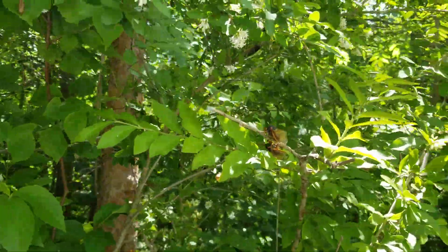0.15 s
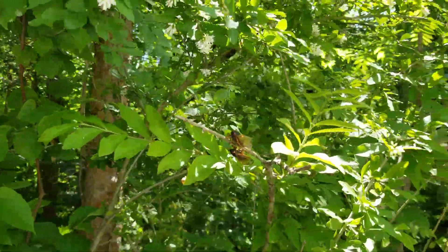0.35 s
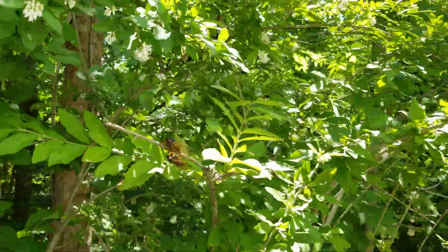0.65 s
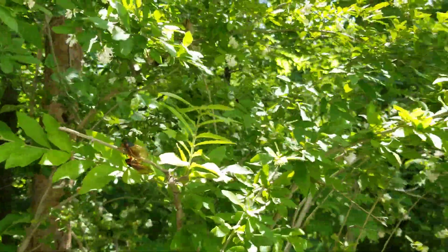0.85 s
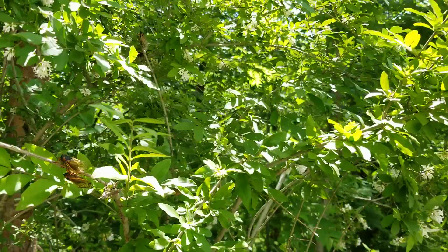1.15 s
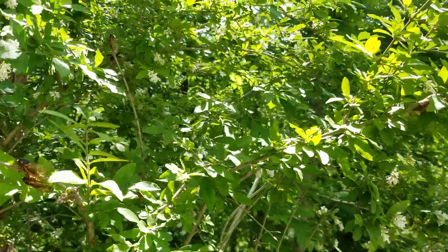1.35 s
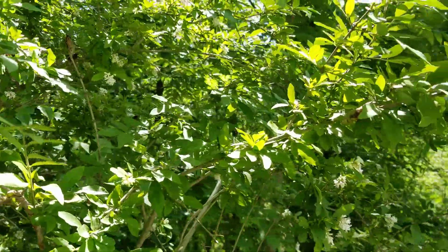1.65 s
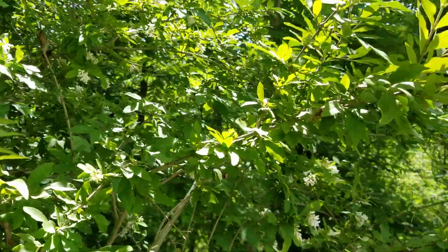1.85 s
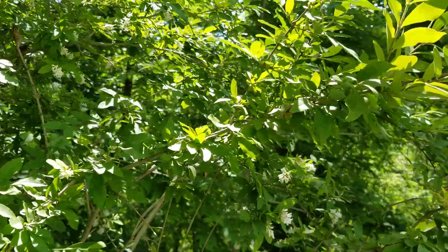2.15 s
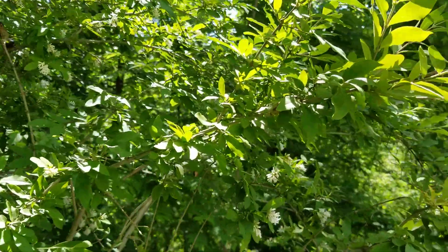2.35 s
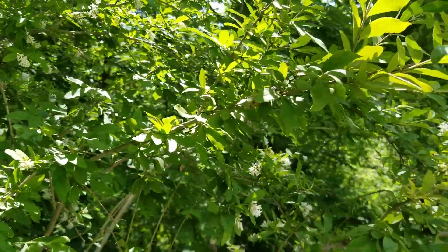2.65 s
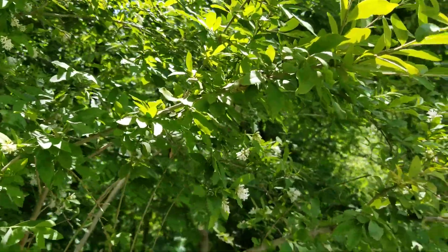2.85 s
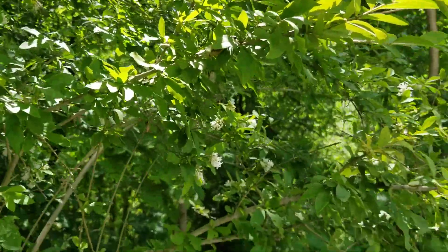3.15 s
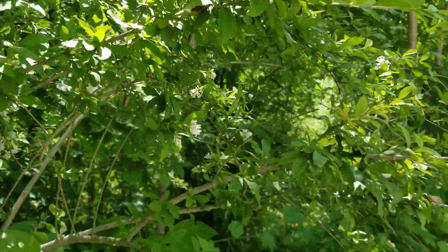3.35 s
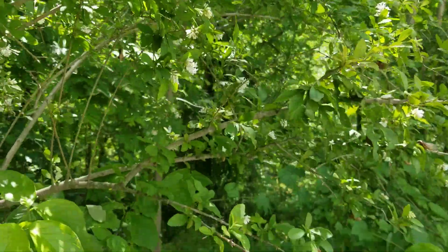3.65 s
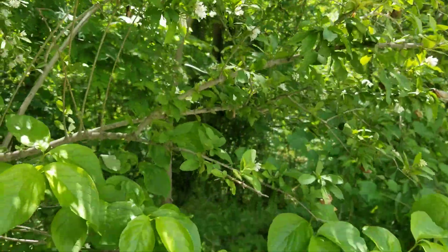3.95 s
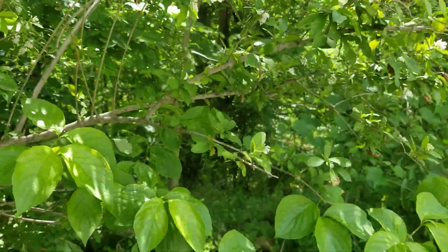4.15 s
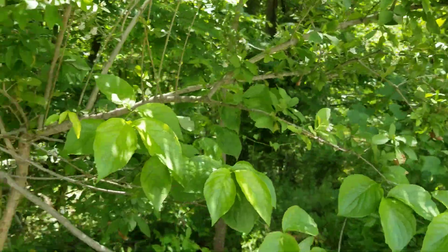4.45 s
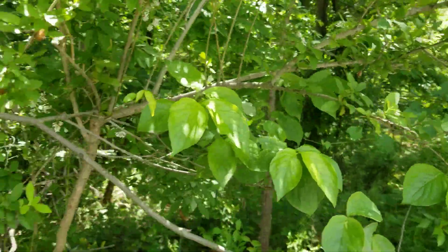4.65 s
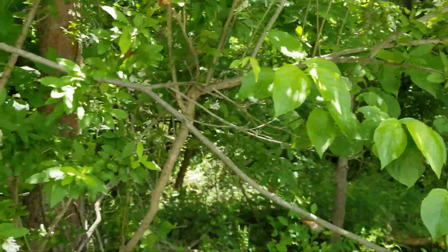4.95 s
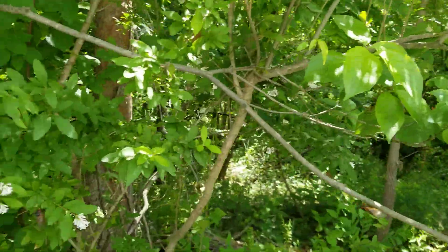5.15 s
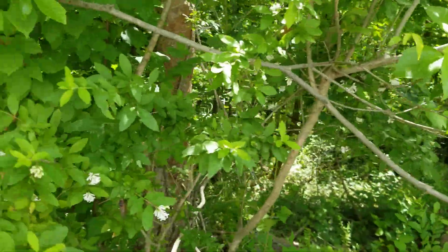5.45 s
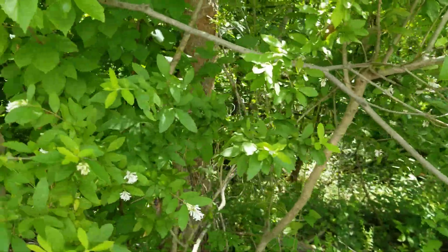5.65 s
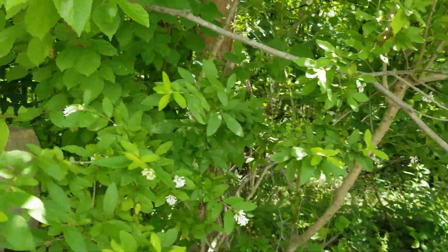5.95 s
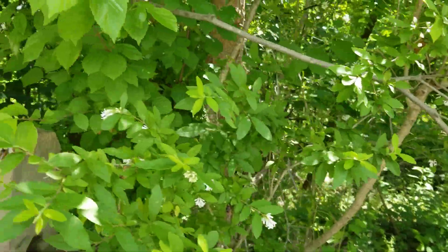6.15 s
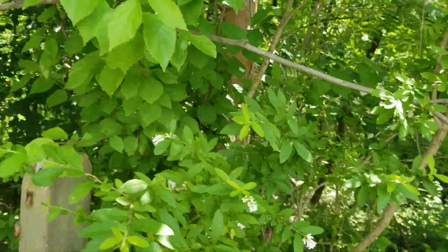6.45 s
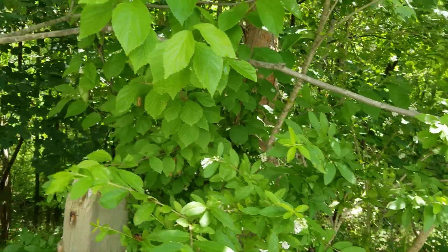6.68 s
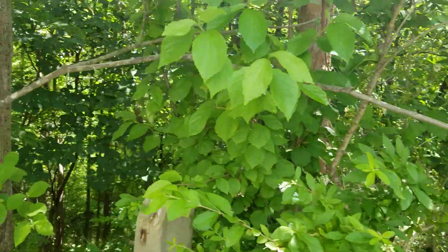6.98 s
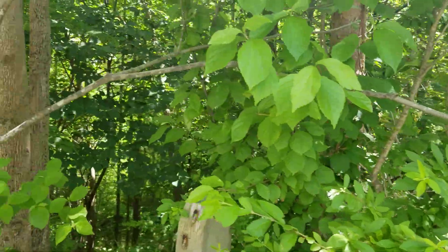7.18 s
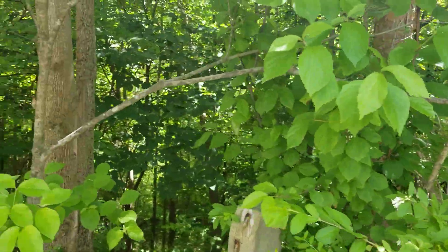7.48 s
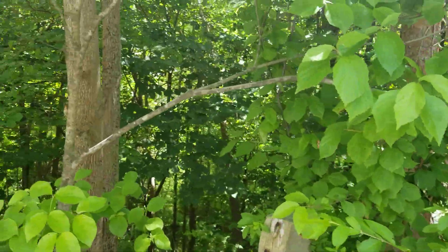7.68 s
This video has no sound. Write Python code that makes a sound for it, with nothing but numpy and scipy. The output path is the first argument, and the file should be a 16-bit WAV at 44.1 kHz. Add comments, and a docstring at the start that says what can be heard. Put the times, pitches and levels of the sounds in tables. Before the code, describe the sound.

In leafy woodland, countless distant cicadas make a constant high sizzle over a smooth, whistly lower drone. Soon a nearby cicada, mostly left, rasps a buzz of about one second, brightening and then dropping abruptly, with a fainter neighbour overlapping. Later a second similar buzz swells and drops. Soft air and distant road rumble lie beneath, the rumble growing late. Outdoor stereo from a handheld device.

```python
"""A woodland full of cicadas: a far shrill chorus, a lower droning species, air, hiss and road rumble.
One near cicada buzzes twice, each buzz ending in a low drop, and a neighbour joins the first buzz.
There are also brief ticks and a faint tone. The far layers are shaped noise. In each near call, pulses from
the tymbals (the ribbed drums of the insect) ring the body and an air sac that opens as the call swells.
Two microphones a hand apart pick it all up."""
import sys
import numpy as np
from scipy import signal
from scipy.io import wavfile
from scipy.ndimage import uniform_filter1d

SR = 44100
rng = np.random.default_rng(int(sys.argv[2]) if len(sys.argv) > 2 else 0)


def master_out(mix):
    """Clip the mix to full scale and print it as 16-bit PCM to the path in sys.argv[1]."""
    frames = np.transpose(np.atleast_2d(mix))
    ceiling = np.clip(frames, -1, 1)
    pcm = np.round(ceiling * 32767).astype(np.int16)
    wavfile.write(sys.argv[1], SR, pcm)


N = 344862  # length of the scene in samples
SPACING_S = 0.00044  # travel time between the microphones
LEFT_LAG_S = 0.000406  # how much later sound from the right-hand side reaches the left microphone
EDGE_HZ = 15775  # upper limit of the microphones

# Near cicada: the two body tones
BODY_WIDTH_HZ, SAC_WIDTH_HZ = 450, 400
BODY_RISE_HZ, BODY_RISE_S = 350, 0.24  # the body tone climbs at the start
BODY_SAG_HZ = 600  # and sinks as the call dies
BODY_RATTLE = .5  # the body hears more of the rattle than the air sac does
BETWEEN_WIDTH_HZ, BETWEEN_DB = 560, -2  # ringing midway between body and sac; level against the sac
# Near cicada: the air sac opens slowly, then snaps shut
OPEN_BEND, SHUT_S = .6, .05
SAC_SHUT_HZ = 4950
SAC_SHUT_DB, SAC_WAKING_DB = -20, -3  # against the open air sac
SAC_STIRS, SAC_WAKES = .12, 0.33  # shares of the opening time at which it starts to sound and is awake
OVERTONE_GROWTH = 1.6  # decibels the overtones swell for each decibel of the sac
# Near cicada: loudness at the start, and pulse rate
ATTACK_S, ATTACK_DB = 0.11, -4
SLOWING = .015  # share by which the pulse rate eases off as the sac opens
WANDER, WANDER_S = .012, .05  # typical share by which the rate wanders, and smoothing time


def amp(db):
    """Turns decibels into gain."""
    return 10 ** (np.asarray(db) / 20)


def evened(x):
    """Scales a sound to an average (rms) level of 1."""
    return x / np.sqrt(np.mean(x ** 2) + 1e-20)


def sides(pan_db):
    """Left and right gains for a left-minus-right level difference."""
    return amp(np.array([pan_db / 2, -pan_db / 2]))


def add(mix, s, sound):
    """Mixes a stereo sound in from time s."""
    part = mix[:, round(s * SR):][:, :sound.shape[1]]
    part += sound[:, :part.shape[1]]


def resonate(x, hz, width_hz):
    """Rings at a pitch that may move: shifts hz to zero, smooths twice, shifts back, with gain 1 at the peak."""
    turn = np.exp(2j * np.pi * np.cumsum(hz * np.ones(x.shape[-1])) / SR)
    r = np.exp(-np.pi * width_hz / SR)
    smooth = signal.lfilter([(1 - r) ** 2], [1, -2 * r, r * r], x / turn)
    return 2 * (turn * smooth).real


def far_crowd(curve, tone, band, direct, patchy_db, pan_db, shading=((0, 0), (1, 0)), size=1024):
    """Countless far sources blur into noise with drifting patches, partly from one side, partly from all around."""
    hop = size // 4
    frames, hz = N // hop + 5, np.fft.rfftfreq(size, 1 / SR)
    a, b, c, d, patches = rng.standard_normal((frames, len(hz), 5)).T
    patches = uniform_filter1d(patches, size=14, axis=0)  # along pitch
    patches = evened(uniform_filter1d(patches, size=12, axis=1))  # along time

    # How alike the two microphones hear each pitch: sound from one side lags, sound from all around blurs
    direct = np.clip(direct, 0, 1)
    from_side = np.exp(2j * np.pi * hz * LEFT_LAG_S)
    all_around = np.sinc(2 * hz * SPACING_S)
    alike = .98 * (direct * from_side + (1 - direct) * all_around)[:, None]
    left = a + 1j * b
    right = alike * left + np.sqrt(1 - abs(alike) ** 2) * (c + 1j * d)
    z = np.array([left, right])

    f, db = np.transpose(tone)
    tone_db = np.interp(np.log(hz + 1), np.log(f + 1), db, -90, -90)
    z *= amp(tone_db[:, None] + patchy_db * patches)
    z *= sides(np.interp(hz, *np.transpose(shading)))[:, :, None]

    # The level curve counts within the band, for the average of both sides
    inside = ((hz > band[0]) & (hz < band[1]))[:, None]
    unit = np.std(signal.istft(z.mean(0) * inside, nperseg=size, noverlap=size - hop)[1])
    sound = signal.istft(z, nperseg=size, noverlap=size - hop)[1][:, :N] / unit
    t = np.arange(N) / SR
    return sound * amp(np.interp(t, *np.transpose(curve))) * sides(pan_db)[:, None]


def road_rumble():
    """Distant traffic heard as deep noise that swells and sinks."""
    # level of 40-250 Hz: (time [s], level [dB])
    road_level = [(0, -46), (2.3, -46.5), (2.8, -43), (4.0, -44), (5.6, -41.5), (6.4, -42.5), (7.2, -37),
                  (7.82, -38)]
    # colour of the noise: (pitch [Hz], relative level per hertz [dB])
    road_tone = [(13, -46), (22, -30), (63, 0), (86, 0.5), (208, -10), (500, -21), (650, -31), (1100, -120)]
    return far_crowd(road_level, road_tone, (40, 250), direct=0.14, patchy_db=1.17, pan_db=1.7, size=4096)


def air_wash():
    """Air and leaves blend into a soft noise below the insects."""
    # level of 400-950 Hz: (time [s], level [dB])
    air_level = [(0, -49.5), (1.5, -51.2), (4.3, -48), (5.1, -50.5), (5.7, -48), (6.8, -50), (7.3, -47),
                 (7.82, -49.5)]
    # colour of the noise: (pitch [Hz], relative level per hertz [dB])
    air_tone = [(200, -7.5), (350, -2.5), (500, -6), (650, 0.5), (850, 4), (1100, 2.5), (1500, -16),
                (1900, -36)]
    return far_crowd(air_level, air_tone, (400, 950), direct=0.18, patchy_db=1.04, pan_db=2.5)


def faint_tone():
    """A low tone of steady pitch: a plain sine that dies away."""
    # its fading level: (time [s], level [dB])
    fading = [(0, -57), (.5, -61), (.9, -63.5), (1.3, -72)]
    t = np.arange(N) / SR
    s, db = np.transpose(fading)
    return amp(np.interp(t, s, db, right=-120)) * np.sqrt(2) * np.sin(2 * np.pi * 342 * t)  # 342 Hz


def hiss_between():
    """Soft noise fills the pitches between the drone and the shrill chorus."""
    # level of 1.8-2.9 kHz: (time [s], level [dB])
    hiss_level = [(0, -53.5), (2.2, -54.5), (4.3, -52.5), (5.3, -53), (6.7, -52), (7.2, -49.5),
                  (7.82, -50.5)]
    # colour of the noise: (pitch [Hz], relative level per hertz [dB])
    hiss_tone = [(1100, -28), (1500, 2), (2000, -1.5), (2500, -5.5), (3100, -9.5), (4000, -23)]
    return far_crowd(hiss_level, hiss_tone, (1800, 2900), direct=0.18, patchy_db=0.83, pan_db=.3)


def droning_species():
    """Many far callers of a lower species blur into noise crowded around one pitch."""
    # level of 1.1-1.6 kHz: (time [s], level [dB])
    drone_level = [(0, -37.5), (1.2, -36.5), (2.4, -37.5), (3.2, -38), (3.8, -36), (4.6, -38), (6.8, -37.3),
                   (7.6, -35), (7.82, -34.5)]
    # colour of the noise: (pitch [Hz], relative level per hertz [dB])
    drone_tone = [(590, -48), (1000, -21), (1080, -14), (1290, 2.5), (1330, 6), (1380, 0.5), (1460, -8),
                  (1600, -17), (1800, -28), (2340, -35), (3960, -120)]
    return far_crowd(drone_level, drone_tone, (1100, 1600), direct=0.28, patchy_db=-0.17, pan_db=1.3)


def shrill_chorus():
    """Countless far cicadas blur into bright noise."""
    # level of 7-9 kHz: (time [s], level [dB])
    chorus_level = [(0, -45), (.6, -45), (1.0, -44.5), (1.6, -44.5), (2.2, -45), (2.5, -46), (3.75, -46),
                    (4.2, -44.5), (4.55, -45.5), (4.95, -49), (5.5, -48), (6.1, -50), (6.75, -49),
                    (7.05, -48.5), (7.82, -46.5)]
    # colour of the noise: (pitch [Hz], relative level per hertz [dB])
    chorus_tone = [(2400, -34), (3100, -23), (3600, -10.5), (4140, -5), (4530, -6), (5180, -1.5),
                   (5800, 1.5), (6500, -2.5), (7000, -8.5), (7880, -16.5), (9290, -29.5), (11800, -22.5),
                   (13000, -25.5), (13800, -31), (15700, -32.5)]
    # the handset shades the treble by pitch: (pitch [Hz], left minus right [dB])
    handset_shading = [(2600, 7), (3500, -5), (5500, 0), (8000, -3.5), (10000, -0.5), (12000, -5.5),
                       (15500, -2)]
    return far_crowd(chorus_level, chorus_tone, (7000, 9000), direct=0.037, patchy_db=0.74, pan_db=6.0,
                     shading=handset_shading, size=512)


def tick_or_drop(s, db, hz, width_hz, length_s, pan_db):
    """A short puff of narrow noise that rises and falls once: a tick, or the low drop that ends a buzz."""
    t = np.arange(4410) / SR
    puff = evened(resonate(rng.standard_normal((2, len(t))), hz, width_hz))
    swell = np.sin(np.pi * np.clip(t / length_s, 0, 1))
    return s, puff * swell * amp(db) * sides(pan_db)[:, None]


def near_cicada(start, open_s, buzz_s, tail_s, effort_db, fade_db, rate, top_hz, body_pan_db,
                open_hz, open_db, sac_pan_db, lag_ms):
    """The two tymbals buckle in turn, strong then weak: a click, then a rattle of ribs, ringing body and air sac."""
    # overtones of the air sac: (multiple of its pitch, width [Hz], level [dB], left minus right [dB])
    overtones = [(1.96, 2400, -14.5, 0.5), (2.5, 2000, -22, 3)]
    t = np.arange(0, buzz_s + tail_s, 1 / SR)

    # How the call unfolds
    opening = np.clip(t / open_s, 0, 1) ** OPEN_BEND
    closing = np.clip((t - buzz_s) / SHUT_S, 0, 1)
    dying = np.clip((t - buzz_s) / tail_s, 0, 1) ** 2
    effort_db = effort_db + ATTACK_DB * np.clip(1 - t / ATTACK_S, 0, 1) + fade_db * dying
    body_hz = top_hz - BODY_RISE_HZ * np.clip(1 - t / BODY_RISE_S, 0, 1) - BODY_SAG_HZ * dying
    sac_hz = SAC_SHUT_HZ + (open_hz - SAC_SHUT_HZ) * opening * (1 - closing)
    sac_growth_db = np.interp(t / open_s, [SAC_STIRS, SAC_WAKES, 1], [SAC_SHUT_DB, SAC_WAKING_DB, 0])
    sac_db = open_db + sac_growth_db + (SAC_SHUT_DB - sac_growth_db - open_db) * closing * 0
    sac_growth_db = sac_growth_db + (SAC_SHUT_DB - sac_growth_db) * closing
    sac_db = open_db + sac_growth_db

    # Clicks: two in each turn, slightly uneven in time and strength
    wander = evened(uniform_filter1d(rng.standard_normal(len(t)), size=round(WANDER_S * SR)))
    turns = np.cumsum(rate * (1 - SLOWING * opening + WANDER * wander)) / SR
    at = np.flatnonzero(np.diff(np.floor(2 * turns)))
    late, strength = rng.standard_normal((len(at), 2)).T
    late_samples = np.round(late * .00004 * SR).astype(int)
    strong_weak = np.where(turns[at] % 1 > .75, 1, .33)
    clicks = np.zeros(len(t))
    clicks[np.clip(at + late_samples, 0, len(t) - 1)] = amp(1.5 * strength) * strong_weak
    right_clicks = np.roll(clicks, shift=round(lag_ms * SR / 1000))

    # Rattle: noise that bursts at each click and fades
    rattle = 0.24 + np.exp(-(turns % 1) / 0.66) + 0.46 * np.exp(-((turns - .5) % 1) / 0.34)
    rattle = evened(rattle * rng.standard_normal((2, len(t))))  # leaves scatter it differently to each side
    drive = .8 * evened(np.array([clicks, right_clicks])) + .45 * rattle
    body_drive = drive + BODY_RATTLE * rattle

    # Ringing
    voice = evened(resonate(body_drive, body_hz, BODY_WIDTH_HZ)) * sides(body_pan_db)[:, None]
    sac = evened(resonate(drive, sac_hz, SAC_WIDTH_HZ))
    voice += amp(sac_db) * sac * sides(sac_pan_db)[:, None]
    between = evened(resonate(body_drive, (body_hz + sac_hz) / 2, BETWEEN_WIDTH_HZ))
    # subtracted, because neighbouring ways of ringing swing in opposition
    voice -= amp(sac_db + BETWEEN_DB) * between * sides(sac_pan_db)[:, None]

    fizz = rng.standard_normal((2, len(t)))  # the overtones are smeared into an even shimmer
    for multiple, width_hz, db, pan_db in overtones:
        shimmer = evened(resonate(fizz, multiple * sac_hz, width_hz))
        shimmer_db = open_db + OVERTONE_GROWTH * sac_growth_db + db
        voice += amp(shimmer_db) * shimmer * sides(pan_db)[:, None]
    return start, voice * amp(effort_db) * signal.windows.tukey(len(t), .06)


def scene():
    """Lays the far layers, then the ticks and drops, then the near callers."""
    # brief ticks, and the low drop that ends each buzz of the near cicada: (start [s], peak level [dB],
    # pitch [Hz], width [Hz], length [s], left minus right [dB])
    ticks_and_drops = [(6.281, -44, 11500, 9000, .007, 12), (7.1, -58, 9200, 1500, .1, 0),
                       (7.55, -58, 9000, 1500, .1, 0), (1.48, -41, 3700, 350, .07, -2),
                       (4.69, -43, 3900, 350, .06, -3)]
    # near cicadas, one row a call: (start [s], time to open the air sac [s], time until it shuts [s],
    # tail length [s], effort [dB], fade over the tail [dB], pulse rate before it eases off [1/s],
    # body pitch after its climb [Hz], body left minus right [dB], open air sac pitch [Hz],
    # open air sac over body [dB], air sac left minus right [dB], right clicks lag left [ms])
    near_calls = [(.69, .45, .76, .18, -31.5, -17, 203, 5040, 7.5, 6200, -0.5, 7.5, .32),
                  (0.902, .35, .9, 0.11, -44, -15, 213, 5050, 3, 6020, 7.5, 2, .3),
                  (3.8, .62, .885, .26, -34.5, -7, 202, 4900, 0, 6260, 2, 9.5, .023)]
    mix = road_rumble()
    mix += air_wash()
    mix += faint_tone()
    mix += hiss_between()
    mix += droning_species()
    mix += shrill_chorus()
    for row in ticks_and_drops:
        add(mix, *tick_or_drop(*row))
    for row in near_calls:
        add(mix, *near_cicada(*row))
    return mix


def record(dry):
    """Each microphone rumbles a little on its own at the lowest pitches; then bass cut and upper limit."""
    own = amp(-57) * evened(resonate(rng.standard_normal((2, N)), 43, 30))
    cut = signal.sosfilt(signal.butter(2, 30, "high", fs=SR, output="sos"), dry + own)
    limit = signal.firwin(3001, EDGE_HZ, window=("kaiser", 9), fs=SR)
    return signal.oaconvolve(cut, limit[None], "same")


dry = scene()
out = record(dry)
master_out(out)
```